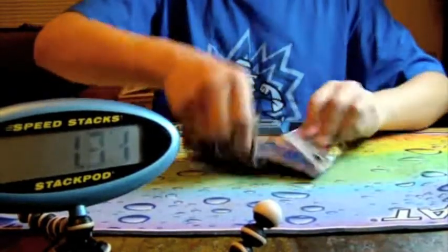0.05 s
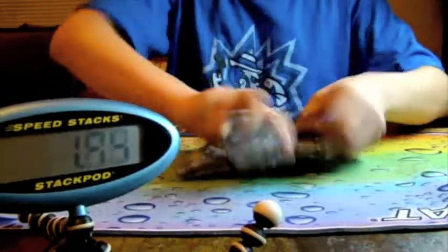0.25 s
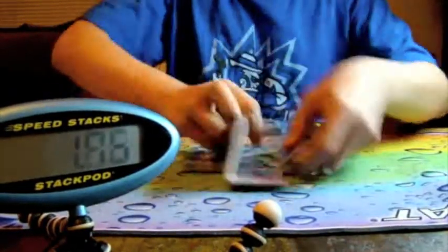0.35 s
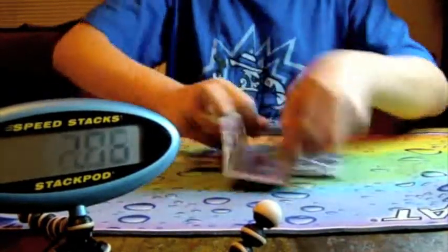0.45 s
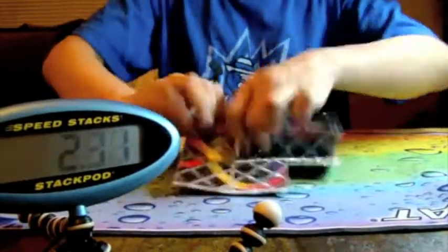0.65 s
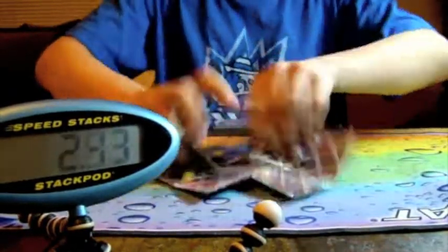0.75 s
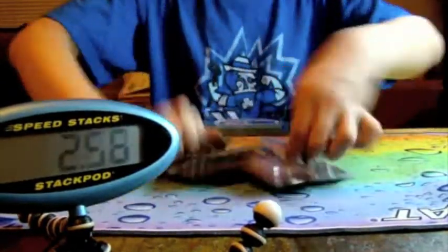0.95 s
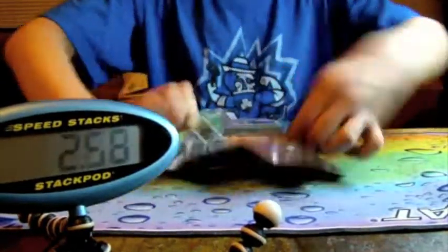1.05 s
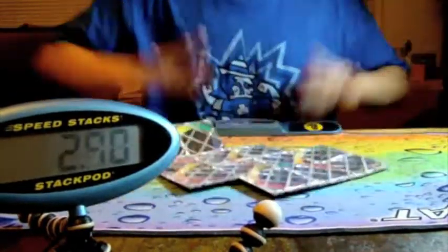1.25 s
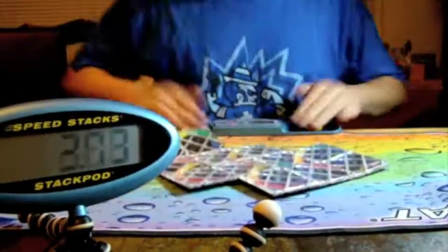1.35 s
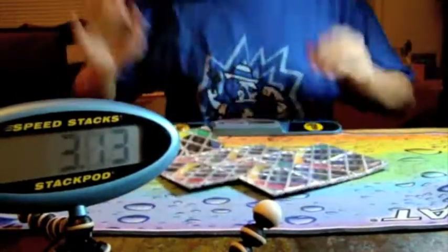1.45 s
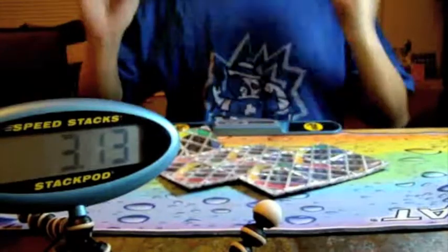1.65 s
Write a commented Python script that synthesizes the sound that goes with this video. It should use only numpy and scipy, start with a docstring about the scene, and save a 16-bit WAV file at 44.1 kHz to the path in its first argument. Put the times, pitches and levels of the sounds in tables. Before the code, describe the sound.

Plastic tiles clack and click in a quick, uneven flurry as a string-hinged puzzle is flipped over, close by in a small, hard room. It knocks down on a mat, a sharp slap follows, then a light plastic rattle.

```python
"""Plastic tiles clack and snap over as a flat, string-hinged puzzle is folded at speed on a table mat.
Each impact excites a brief, broad band of resonances. Strings and tiles stick and slip, crinkling and
ticking, and the stack knocks on the mat. A slap on the mat ends the run and rings through the small,
hard room; loose plastic rattles afterwards."""
import sys
import numpy as np
from scipy import signal
from scipy.fft import rfft, irfft, next_fast_len
from scipy.io import wavfile
from scipy.ndimage import uniform_filter1d

SR = 44100
rng = np.random.default_rng(int(sys.argv[2]) if len(sys.argv) > 2 else 0)


def generate_wav(signal):
    """Clip the signal to [-1, 1] and save it as 16-bit WAV at the path in sys.argv[1]."""
    frames = np.transpose(np.atleast_2d(signal))
    scaled = np.clip(frames, -1, 1) * 32767
    pcm = np.round(scaled).astype(np.int16)
    wavfile.write(sys.argv[1], SR, pcm)


N = 74970
TIME = np.arange(N) / SR
HIT_SAMPLES, LEAD_S = 4096, 0.005   # length of one contact; its lead-in before the impact
TREBLE_HZ = 8700

# Friction envelope, swelling with each fold and after the slap: t/s, level/dB
FRICTION_LEVEL = [(0, -45.5), (.05, -43.5), (.11, -46.5), (.2, -64.5), (.235, -27), (.28, -40), (.325, -40),
                  (.348, -35), (.385, -34), (.43, -48.5), (.5, -36.5), (.62, -68), (.69, -42), (.82, -44),
                  (.89, -35), (.95, -44.5), (1.03, -44), (1.11, -49), (1.145, -30), (1.2, -40.5),
                  (1.315, -65), (1.345, -32.5), (1.54, -70.5)]


def from_db(db):
    """Amplitude ratio of a level: a factor of ten per 20 dB."""
    return 10 ** (np.asarray(db) / 20)


def unit_rms(x):
    """Normalisation to unit mean power."""
    return x / np.sqrt(np.mean(x ** 2) + 1e-20)


def decay(t, t60):
    """Exponential damping: the level falls 60 dB in t60 seconds."""
    return np.exp(-np.log(1000) * t / np.maximum(t60, 1e-4))


def wander(size, count):
    """Band-limited Gaussian fluctuation through count independent values."""
    return signal.resample(rng.standard_normal(count), size)


def at_hz(points, size):
    """Interpolation of (f/Hz, value) points over log frequency, at the bins of an FFT."""
    hz, value = np.transpose(sorted(points))
    return np.interp(np.log(np.fft.rfftfreq(size, 1 / SR) + 1), np.log(hz), value)


def minimum_phase(gain):
    """Causality: folding the cepstrum gives a magnitude response its minimum phase."""
    cepstrum = irfft(np.log(gain + 1e-9))
    half = len(cepstrum) // 2
    cepstrum[1:half] *= 2
    cepstrum[half + 1:] = 0
    return np.exp(rfft(cepstrum))


def coloured(x, points):
    """Causal filtering by a response given as f/Hz, level/dB."""
    size = 2 * next_fast_len(len(x))
    return irfft(rfft(x, size) * minimum_phase(from_db(at_hz(points, size))))[:len(x)]


def add(paths, start_s, sound, room_db):
    """Superposition of a sound on the direct path (row 0) and the path into the room (row 1)."""
    start = max(int(round(start_s * SR)), 0)
    part = sound[:max(N - start, 0)]
    paths[:, start:start + len(part)] += np.outer([1, from_db(room_db)], part)


def room_tone(level_db=-54.5):
    """Stationary coloured noise forms the background."""
    # Background spectrum: f/Hz, level/dB
    spectrum = [(30, -8.5), (120, -1), (170, -2), (215, 17), (300, 4.5), (900, 8), (1450, 10.5),
                (2200, 8.5), (2850, 15.5), (3700, -29.5), (10000, -42)]
    return from_db(level_db) * unit_rms(coloured(rng.standard_normal(N), spectrum))


def reflections(size=32768, gap_s=0.0016, build_s=0.0078):
    """A diffuse field builds up after a short gap; absorption damps each octave at its own rate."""
    # Reverberation time: f/Hz, t60/s
    reverberation = [(100, 0.11), (260, 0.28), (700, 0.35), (1840, 0.32), (4850, 0.37), (10000, 0.37)]
    # Spectrum of the reflections: f/Hz, level/dB
    colour = [(40, -47), (110, -0.5), (210, 2.5), (600, 2), (3000, -1.5), (10000, -7.5)]
    t, t60 = TIME[:size], at_hz(reverberation, size)
    white = rfft(rng.standard_normal(size))
    octave = np.round(np.log2(np.fft.rfftfreq(size, 1 / SR) + 20))
    bands = [octave == k for k in np.unique(octave)]
    tail = sum(irfft(white * band) * decay(t, t60[band].mean()) for band in bands)
    tail *= np.clip((t - gap_s) / build_s, 0, 1)
    return coloured(tail / np.linalg.norm(tail), colour)


def room(sent, patterns=5, step_s=0.014):
    """Reflection paths depend on position: the moving puzzle meets changing patterns of echoes."""
    place = TIME / step_s
    crossfades = [np.sin(np.pi / 2 * np.minimum((place - k) % patterns, 2)) for k in range(patterns)]
    return sum(signal.fftconvolve(sent * fade, reflections())[:N] for fade in crossfades)


def string_ticks(ticks_per_s=180, base_db=-51.5):
    """Stick-slip: taut strings catch in their grooves with dry, bright ticks, stronger at each fold."""
    # Tick spectrum: f/Hz, level/dB
    colour = [(1500, -9), (5000, 1), (10000, 5.5)]
    effort_db = np.interp(TIME, *np.transpose(FRICTION_LEVEL))
    catches = rng.standard_normal(N) * (rng.random(N) < ticks_per_s / SR)
    return unit_rms(coloured(catches, colour)) * from_db(base_db + effort_db - effort_db.mean())


def crinkle(slips_per_s=2500, spread_db=3, clump_db=4, bandwidth_hz=420):
    """Friction as shot noise: tiny slips of strings and tiles each excite a damped resonance."""
    # Crinkle spectrum: f/Hz, level/dB
    colour = [(60, -10), (300, -7), (800, 1), (1500, 10.5), (2400, 7.5), (3150, 15), (4700, 5.5),
              (6000, -7.5), (10000, -30)]
    pitches_hz = np.linspace(400, 9900, 24)
    radius = np.exp(-np.pi * bandwidth_hz / SR)
    grains = np.zeros(N)
    for hz in pitches_hz:
        sizes = from_db(spread_db * np.minimum(rng.exponential(1, N), 4)) * rng.choice([-1, 1], N)
        slips = sizes * (rng.random(N) < slips_per_s / len(pitches_hz) / SR)
        slips *= from_db(clump_db * wander(N, count=170))   # each pitch comes in bursts
        pole_real = radius * np.cos(2 * np.pi * hz / SR)
        grains += signal.lfilter([1, -pole_real], [1, -2 * pole_real, radius ** 2], slips + 1e-18)
    envelope = from_db(np.interp(TIME, *np.transpose(FRICTION_LEVEL)))
    paths = np.zeros((2, N))
    add(paths, 0, unit_rms(coloured(grains, colour)) * envelope, room_db=-8)
    return paths


def contact(colour, ring_s, crack_share, crack_s=0.0034, rise_s=0.0058, rise_db=-2.5):
    """Impact noise: a brief swell leads into the crack and chatter; energies add. Times are for 60 dB."""
    t = TIME[:HIT_SAMPLES] - LEAD_S
    chatter = np.where(t < 0, from_db(rise_db) * decay(abs(t), rise_s), decay(abs(t), ring_s))
    crack = (t >= 0) * decay(abs(t), crack_s)
    power = crack_share * unit_rms(crack) ** 2 + (1 - crack_share) * unit_rms(chatter) ** 2
    spectrum = rfft(rng.standard_normal(HIT_SAMPLES) * np.sqrt(power))
    trend = np.sqrt(uniform_filter1d(abs(spectrum) ** 2, size=90))   # divided out to flatten the noise
    return irfft(spectrum * minimum_phase(from_db(at_hz(colour, HIT_SAMPLES)) / trend))


def resonant_ripple(sound, ripple_db=3.5):
    """Resonances differ from contact to contact, so each favours other frequencies."""
    gain = from_db(ripple_db * wander(HIT_SAMPLES // 2 + 1, count=44))
    return irfft(rfft(sound) * minimum_phase(unit_rms(gain)))


def rattle():
    """Light impacts excite the body and edge resonances of a loose, hollow plastic part."""
    # Impacts: t/s, level/dB, relative mids/dB, relative treble/dB
    impacts = [(1.534, -9.5, 6, -10.5), (1.5457, -10, 11, -26), (1.561, -8, 3.5, -19),
               (1.578, 0.5, -2, -22), (1.59, -5, 3, -18), (1.5932, -11, 11, -7), (1.5996, 3, -3.5, -12),
               (1.6478, -22.5, 20, 2), (1.656, -3.5, -2, -23), (1.6609, -3.5, 5.5, -12),
               (1.6945, 0.5, -0.5, -24)]
    # Hollow body: f/Hz, level/dB re the mids
    body = [(40, -50), (500, -24), (1050, -15), (1450, 3.5), (1950, -4), (2500, -10)]
    # Hard edge: f/Hz, level/dB
    edge = [(3400, -4), (4700, 2), (6300, -8)]
    paths = np.zeros((2, N))
    for t, db, mid_db, treble_db in impacts:
        colour = [(hz, body_db + mid_db) for hz, body_db in body] + edge + [(TREBLE_HZ, treble_db)]
        tick = resonant_ripple(contact(colour, ring_s=0.013, crack_share=0.11))
        add(paths, t - LEAD_S, from_db(db) * tick, room_db=-52)
    return paths


def slap():
    """Impulsive excitation: a double impact on the mat leaves damped modes in free vibration."""
    # Impacts: t/s, level/dB, t60/s, room send/dB
    impacts = [(1.324, 10.5, 0.031, -17), (1.3305, 14.5, 0.039, 5.5)]
    # Impact spectrum: f/Hz, level/dB
    colour = [(30, -24.5), (120, -32.5), (350, -13), (510, -7.5), (1100, -1), (2100, 2.5), (3300, -2.5),
              (5000, 0.5), (8000, -5), (10000, -0.5)]
    # Ringing modes: f/Hz, level/dB, t60/s
    modes = [(113.4, -51.5, 0.58), (201, -42.5, 0.38), (300, -49.5, 0.4), (536, -34, 0.19),
             (582, -27, 0.16), (635, -33.5, 0.24), (986, -25.5, 0.18), (1067, -29, 0.25), (1187, -36, 0.13),
             (1898, -34.5, 0.43)]
    paths = np.zeros((2, N))
    for t, db, ring_s, room_db in impacts:
        add(paths, t - LEAD_S, from_db(db) * contact(colour, ring_s, crack_share=0.56), room_db)
    ringing = sum(from_db(db) * np.cos(2 * np.pi * hz * TIME) * decay(TIME, t60) for hz, db, t60 in modes)
    add(paths, impacts[-1][0], ringing, room_db=-12)
    return paths


def knocks(bass_hz=400):
    """Cushioned impact: the whole stack strikes the mat with little crack and a duller spectrum."""
    # Blows: t/s, level/dB, relative bass/dB, room send/dB
    blows = [(0.0793, -4, -9, -15), (0.2352, 3, -13, -7), (0.2505, 0, -4, -3), (0.2981, 1.5, -11, -7),
             (0.3899, 0.5, -7, -6), (0.5349, -7.5, 6, -7.5), (0.712, -7, 3, -3), (0.8662, 2, -4, -6.5),
             (1.1548, 3, -8.5, 4), (1.161, 13, -15, -9.5)]
    # Lower spectrum: f/Hz, level/dB re the bass
    lows = [(40, -36), (160, -32), (290, 6)]
    # Upper spectrum: f/Hz, level/dB
    highs = [(950, -1), (1600, 4.5), (2600, -8), (5000, -10), (10000, -13)]
    paths = np.zeros((2, N))
    for t, db, bass_db, room_db in blows:
        colour = [(hz, low_db + bass_db) for hz, low_db in lows] + [(bass_hz, bass_db)] + highs
        add(paths, t - LEAD_S, from_db(db) * contact(colour, ring_s=0.015, crack_share=0.12), room_db)
    return paths


def hinge_snaps():
    """Snap-through: a hinge flips over and radiates one sharp pressure pulse."""
    # Snaps: t/s, level/dB
    snaps = [(0.2153, -0.5), (0.3280, 1.5), (0.5377, -10), (0.6687, -6), (0.8252, -8.5), (0.8976, -7.5),
             (1.0014, -18.5)]
    # Pulse spectrum: f/Hz, level/dB
    colour = [(30, -4), (300, 3.5), (2000, 3), (5000, 6.5), (10000, 2.5)]
    pulse = -coloured(signal.unit_impulse(HIT_SAMPLES), colour)
    paths = np.zeros((2, N))
    for t, db in snaps:
        add(paths, t, from_db(db) * pulse, room_db=-11)
    return paths


def tile_clacks(mid_hz=1500, presence_hz=3850):
    """Hard impact of tile edges: small parts radiate little bass; the blow sets mids and treble."""
    # Collisions: t/s, level/dB, relative mids/dB, relative treble/dB, room send/dB
    collisions = [(0.0159, 1, -1.5, -11, -4.5), (0.138, -12.5, 1, -4, 2.5), (0.1769, -6, 0.5, -2, -32),
                  (0.1858, -6, -7, 5.5, -36), (0.1931, -7.5, 3, -25, 2), (0.2154, 7, -5.5, -3, -0.5),
                  (0.2416, -6.5, 2, 2, -3), (0.2737, -2.5, 0, -7, 4.5), (0.3042, 4, -12, -3, -25),
                  (0.3081, -0.5, -6.5, -4, -7), (0.3175, 0, -6, -0.5, 3.5), (0.3282, 2.5, 1.5, -10, 2),
                  (0.3425, 0, -2.5, 2.5, 2.5), (0.388, 7.5, -13, -11.5, -4), (0.446, -8.5, 1, 2.5, -7),
                  (0.4581, -13.5, 7.5, 4, -5.5), (0.471, -11.5, 5, -1.5, -17), (0.5048, -6, 1.5, 0, -25),
                  (0.5318, 2.5, -2, -2, 1.5), (0.537, -11.5, 2, 8, -7), (0.604, -8, 3.5, -4, -18),
                  (0.647, 4.5, -9.5, -7, -24), (0.6575, 1.5, -7, -33, 4), (0.6687, 13, -17.5, -12.5, 2.5),
                  (0.675, 1.5, -8.5, -4.5, -3.5), (0.687, -4.5, -26, 0.5, 9), (0.7129, -1.5, -7, -3, -2),
                  (0.7214, -6, 3.5, -16, -1), (0.7278, -7, 7.5, 1, 4), (0.7457, 8, -9.5, -9, -15),
                  (0.7594, -6.5, 10, 1, -17), (0.7924, -6, 0.5, 1, -15), (0.8065, -7.5, 4, 8.5, -27),
                  (0.8255, 4, -21, -8.5, 6.5), (0.837, 1, -15, -7.5, 9.5), (0.8978, 1.5, 2.5, -2, -8),
                  (0.9661, -3, -13, 2.5, -34), (0.9999, 2.5, -19, -5, 0.5), (1.0195, -11, 1, 10, -26),
                  (1.0484, -13.5, 7, 11, -30), (1.054, -7.5, 2, -6.5, -4), (1.0668, 0, -1.5, 0, -31),
                  (1.0829, -13, 1, 12.5, -24), (1.125, 1, -2.5, -5.5, -8.5), (1.138, -0.5, 2, -2.5, -16),
                  (1.155, -2.5, 9, -3, -15), (1.2162, -2.5, -13, -4.5, -11.5)]
    # Bass roll-off: f/Hz, level/dB re the mids
    lows = [(40, -33.5), (250, -21.5), (600, -9.5)]
    paths = np.zeros((2, N))
    for t, db, mid_db, treble_db, room_db in collisions:
        colour = [(hz, low_db + mid_db) for hz, low_db in lows]
        colour += [(mid_hz, mid_db), (presence_hz, 0), (TREBLE_HZ, treble_db)]
        clack = resonant_ripple(contact(colour, ring_s=0.017, crack_share=0.35))
        add(paths, t - LEAD_S, from_db(db) * clack, room_db)
    return paths


def scene():
    """Superposition of direct sound, reverberation and background in one channel."""
    direct, sent = tile_clacks() + hinge_snaps() + knocks() + slap() + rattle() + crinkle()
    background = room_tone()
    return (direct + string_ticks() + room(sent) + background)[None]


def record(dry):
    """Soft saturation rounds the highest peaks; a steep low-pass limits the bandwidth."""
    ceiling, cutoff_hz = 0.75, 10080
    rounded = ceiling * np.tanh(dry / ceiling)
    taps = signal.firwin(601, cutoff_hz, fs=SR)
    return signal.fftconvolve(rounded, taps[None], mode="same", axes=1)


dry = scene()
out = record(dry)
generate_wav(out)
```